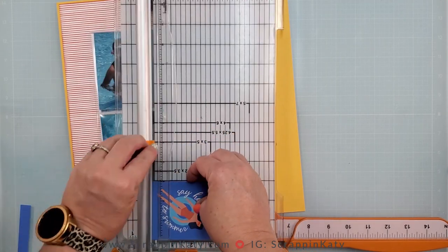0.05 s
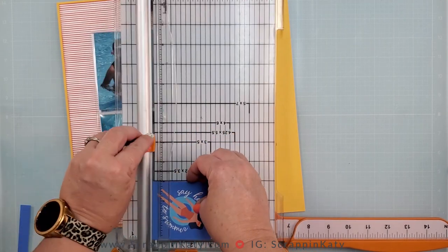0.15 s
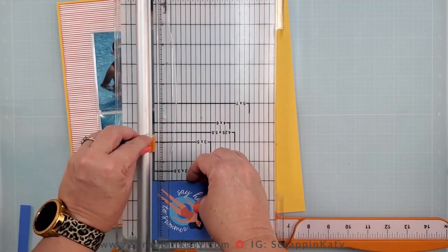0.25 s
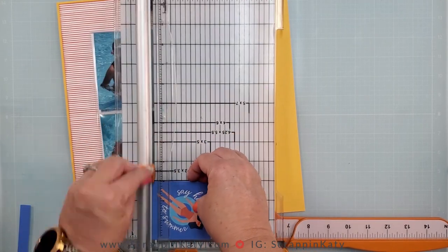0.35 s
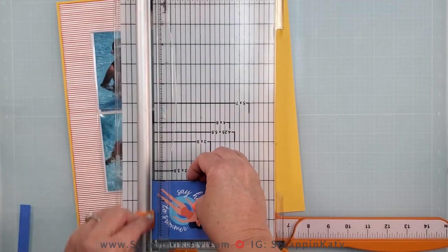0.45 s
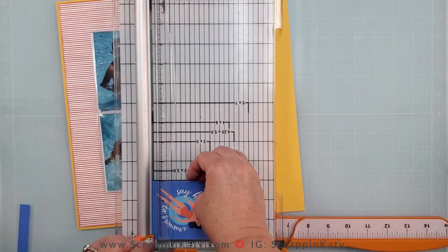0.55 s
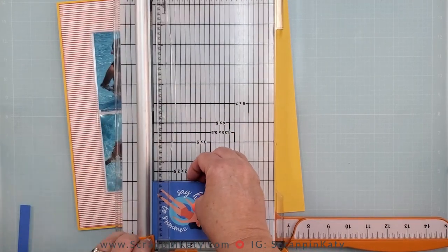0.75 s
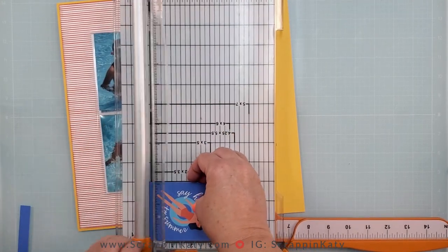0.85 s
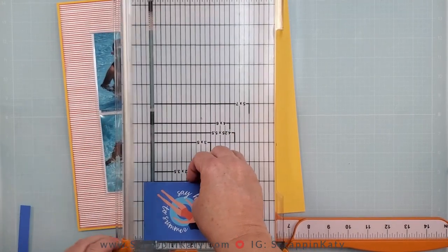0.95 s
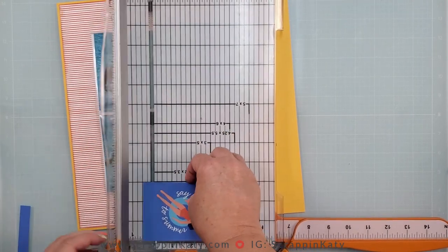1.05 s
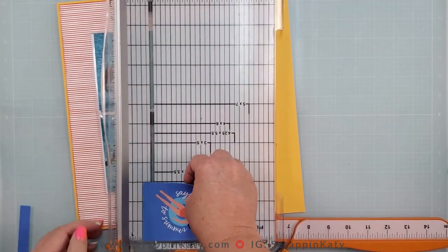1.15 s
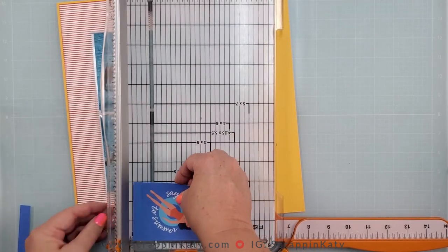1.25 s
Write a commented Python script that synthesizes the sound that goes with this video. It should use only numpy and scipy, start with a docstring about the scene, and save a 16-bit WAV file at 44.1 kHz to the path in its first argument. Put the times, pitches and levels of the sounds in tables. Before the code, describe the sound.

A sliding paper trimmer gives a sharp hollow plastic clack, a pause, a short gritty cut through cardstock ending in a knock, then faint rubbing and a soft rail rattle; close stereo microphone, small quiet room.

```python
"""A sliding paper trimmer is the main source: its blade carriage slides, clicks down, cuts through cardstock
and hits its end stop; then the guide rail is lifted. Contacts ring decaying modes of the hollow plastic base,
with short booms and noise cracks. Rubbing, cutting and lifting are gritty noise through resonances and hiss;
high carriage squeaks and lower rail tones in the cut are short tones. The table thumps, and a small room
answers over room air and a faint hum."""
import sys
import numpy as np
from scipy import signal
from scipy.fft import rfft, irfft, next_fast_len
from scipy.io import wavfile
from scipy.ndimage import uniform_filter1d, map_coordinates

SR = 44100
rng = np.random.default_rng(int(sys.argv[2]) if len(sys.argv) > 2 else 0)


def wrap_up_sound(samples):
    """Save the sound to the file named by the first command line argument, as 16-bit audio."""
    columns = np.atleast_2d(samples).T
    # keep every value between -1 and 1, then stretch to whole-number steps
    tamed = np.clip(columns, -1, 1)
    steps = np.round(tamed * 32767).astype(np.int16)
    wavfile.write(sys.argv[1], SR, steps)


N = 57330

# Levels below are source levels, ahead of the base's bass loss. Resonance and colour levels are relative.
# trimmer contacts: start_s, knock_db, ring_db, dull_crack_db, bright_crack_db, pitch_hz, rise_s, crack_t60_s
CONTACTS = [(.101, -54, -34.5, -52, -72, 540, 0.0041, 0.075),
            (0.1782, -48.5, -29, -38, -26, 500, 0.00042, 0.045),
            (.187, -37, -24, -48, -39.5, 416, 0.00035, 0.041),
            (.2040, -10.5, -31, -16, -39.5, 599, 0.00039, 0.024),
            (.2074, -7.5, -8.5, -17, -18, 539.7, 0.00051, 0.041),
            (0.464, -60, -41, -78, -78, 438, 0.00361, .02),
            (.606, -37.5, -35.5, -43, -39, 491.5, 0.00031, 0.03),
            (0.7499, -62, -16, -18.5, -21.5, 786, 0.00032, 0.033),
            (.7530, -19, -23.5, -43, -46.5, 616, 0.0025, 0.01),
            (.7585, -45, -16, -33, -66, 465, 0.0017, 0.02),
            (.878, -77.5, -67, -53, -60.5, 544, 0.0041, 0.059),
            (0.9, -51.5, -41.5, -59, -68, 540, 0.0013, 0.033),
            (0.963, -57, -31.5, -47, -63, 790, 0.00024, 0.055),
            (1.09, -48.5, -39.5, -62.5, -90.5, 432, 0.0026, .02),
            (1.257, -36.5, -28.5, -34, -42, 573, 0.0027, 0.027),
            (1.265, -34, -31, -39, -44, 550, 0.0016, 0.1), (1.28, -33, -40, -37, -33.5, 560, 0.0039, 0.045)]
# modes of the hollow plastic base: pitch_hz, level_db, t60_s
BASE_MODES = [(275, -11, 0.2), (339, -16, 0.25), (427.2, -4, 0.072), (532.2, -4, 0.11), (610, -2, 0.018),
              (743, -3, 0.039), (977, -12.5, 0.026), (1180, -14.5, 0.04), (1520, -19, 0.04),
              (1890, -18.5, 0.035), (3300, -19, 0.025)]
# noise colours of the two cracks: pitch_hz, level_db
DULL_COLOUR = [(200, -57), (500, -25.5), (900, -5.5), (1500, -6.5), (2300, -7), (3400, -7), (4300, -10.5),
               (6000, -34), (9000, -66.5)]
BRIGHT_COLOUR = [(2500, -42), (4000, -9), (5600, 5), (7300, 0.5), (9000, -7), (10200, -10), (12000, -5),
                 (16000, -9)]
# blade judders in the card that knock the base: start_s, level_db, pitch_hz
JUDDERS = [(.637, -36, 504), (.648, -35.5, 494), (.662, -41, 425), (.673, -36, 540), (.692, -36.5, 372)]
# blade in the card: time_s, base_buzz_db, low_rail_db, high_rail_db, fibre_hiss_db
CUT = [(0.609, -37.5, -37.5, -50, -41), (0.621, -51, -53, -54.5, -42), (0.671, -41, -44, -46.5, -39.5),
       (0.697, -53, -51, -52.5, -42), (0.719, -48.5, -46.5, -41.5, -42.5), (0.733, -45, -44, -57, -46.5),
       (0.749, -40, -47, -61, -44.5)]
# base buzz resonances: pitch_hz, half_width_hz, level_db
BUZZ = [(440, 30, -3), (515, 40, 0), (600, 40, -9)]
# low and high rail resonances while cutting: pitch_hz, half_width_hz, level_db
CUT_LOW = [(1045, 25, 0), (1420, 70, -8)]
CUT_HIGH = [(3240, 150, 0)]
# colour of the parting fibres: pitch_hz, level_db
CUT_HISS = [(940, -16.5), (1600, -9), (1710, -26), (1880, -13.5), (2740, -17), (3230, -3.5), (4190, -21),
            (6720, -11.5), (16000, -19.5)]
# passages of carriage and rail rubbing: time_s, base_buzz_db, low_rail_db, high_rail_db, hiss_db
RUB = [
    [(0.0, -65, -101, -49, -62), (0.016, -79.5, -65.5, -53, -59.5), (0.086, -73, -97, -59, -60),
     (0.114, -60, -104, -66, -57.5), (0.172, -84, -66, -69, -66)],
    [(0.33, -61.5, -69.5, -82, -84.5), (0.376, -75.5, -96, -99, -92), (0.446, -80, -102, -100.5, -81),
     (0.536, -82.5, -69, -82, -62), (0.58, -78.5, -85.5, -69, -61), (0.602, -72.5, -63, -55, -53)],
    [(0.82, -58, -93, -69, -66), (0.858, -62, -70, -82, -72.5), (0.878, -60, -81, -57, -74),
     (0.9, -53.5, -61, -74, -69), (0.95, -77.5, -93, -88.5, -95.5)],
    [(0.99, -49.5, -74, -63, -72), (1.014, -61.5, -73, -87, -76), (1.096, -81.5, -74, -76, -77),
     (1.208, -67, -68, -67, -64), (1.238, -50, -66.5, -61.5, -55), (1.255, -41, -65, -57, -53.5)],
]
# low and high rail resonances while rubbing: pitch_hz, half_width_hz, level_db
RAIL_LOW = [(1050, 40, -7), (1390, 40, 0)]
RAIL_HIGH = [(2220, 80, -10), (3100, 150, -5), (3480, 50, 0)]
# colour of the rubbing hiss: pitch_hz, level_db
RUB_HISS = [(2060, -21.5), (3500, -26.5), (4240, -16), (5600, -12.5), (7560, -17), (9930, -31.5),
            (11600, -21), (16000, -24.5)]
# short tones, high carriage squeaks and lower rail tones during the cut;
# their levels waver around level_db: start_s, length_s, pitch_hz, level_db
SHORT_TONES = [(0.07, 0.02, 4310, -59.5), (.113, .016, 5650, -60.5), (0.673, 0.014, 1063, -50),
               (.697, 0.038, 1088, -45)]
# jolts of the lifting rail: start_s, level_db
LIFT = [(1.186, -59), (1.241, -49.5), (1.263, -35.5), (1.272, -39.5), (1.278, -38)]
# resonances of the lifted rail: pitch_hz, half_width_hz, level_db
LIFT_RING = [(1150, 50, -5), (3470, 100, 0), (11800, 250, -14)]
# table thumps: start_s, peak_db, pitch_hz
THUMPS = [(.203, -54, 61.9), (0.23, -47.5, 97.8), (0.612, -48.5, 66.7), (0.758, -34, 63.6),
          (1.006, -54, 70), (1.275, -42.5, 87)]
# room decay: pitch_hz, t60_s
ROOM = [(100, 0.3), (500, 0.16), (2000, 0.16), (6000, 0.13), (15000, 0.12)]
# colour of the room air: pitch_hz, level_db
AIR = [(15, -52.5), (25, -18.5), (76, 1.5), (123, -10.5), (217, -5.5), (293, -8.5), (775, -19.5),
       (1130, -23), (4490, -30), (7310, -36), (16000, -50.5)]
# hum tones, whose levels waver around: pitch_hz, peak_db
HUM = [(181, -71.5), (241, -68.5), (299, -71)]

FAVOUR_DB, FAVOUR_OCT = 12, .2  # contrast of modes near the contact's pitch, and how near
SOFT_LOSS = .25  # how fast a soft contact loses the upper modes
KNOCK_CYCLES = 2.4  # the hollow base booms this long before the contact damps it
CUT_RISE, BUZZ_SINK = 1.08, .92  # pitch ratios late in the cut: rail ring and base buzz
CUT_RISE_S = .685, .715  # start and end of that pitch change
LIFT_RISE_S, LIFT_T60_S = 0.00056, 0.056
TABLE_S = 0.017  # time to the top of a thump
RADIATES_HZ = 100  # the small base gives off little bass below
PORT_HZ, PORT_RAD = 1020, 1.78  # ports differ in phase above this pitch, by up to this angle
PORT_STEP_HZ = 130  # how quickly the lead wanders with pitch
ROOM_DB, ROOM_DELAY_S = -15.5, .011
ROOM_WIDE_HZ = 486.7  # the room is near mono below
AIR_LAYER_DB = -68.5 + 20 * np.log10(1.2)  # rms of each of the two air layers
TOP_HZ = 15750  # band limit


def amp(db):
    """Turn dB into gain."""
    return 10 ** (np.asarray(db) / 20)


def unit(x):
    """Bring a sound to rms 1."""
    return x / np.sqrt(np.mean(x ** 2) + 1e-20)


def along(points, hz):
    """Read a curve of (pitch_hz, value) points on a log pitch axis."""
    point_hz, values = np.transpose(points)
    return np.interp(np.log(hz + 1), np.log(point_hz + 1), values)


def gains(rows):
    """Draw one gain curve for each dB column, at -150 dB outside the rows."""
    times, *columns = np.transpose(rows)
    now = np.arange(N) / SR
    return [amp(np.interp(now, times, levels_db, -150, -150)) for levels_db in columns]


def since(start):
    """Seconds since an event, held at zero before it."""
    return np.clip(np.arange(N) / SR - start, 0, None)


def wobble(rate):
    """Draw a smooth random curve with this many knots a second."""
    knots = rng.standard_normal(int(N * rate / SR) + 4)
    return map_coordinates(knots, [np.arange(N) * rate / SR])


def filtered(x, response):
    """Shape a sound by a complex response of frequency."""
    size = next_fast_len(N + SR // 2)
    spectrum = rfft(x, size) * response(np.fft.rfftfreq(size, 1 / SR))
    return irfft(spectrum, size)[..., :N]


def resonant(peaks, grit_db):
    """Gritty noise through steep two-stage resonances, 6 dB down at the half width; rms 1."""
    grit = rng.standard_normal(N) * amp(grit_db * wobble(300))

    def shape(f):
        total = 0
        for centre, width, db in peaks:
            stage = 2j * f * width / (centre * centre - f * f + 2j * f * width)
            total = total + amp(db) * stage ** 2
        return total

    return unit(filtered(grit, shape))


def hiss(spectrum, grit_db, channels=()):
    """Coloured noise, its level grainy where grit is given; rms 1."""
    noise = rng.standard_normal(channels + (N,)) * amp(grit_db * wobble(200))
    return unit(filtered(noise, lambda f: amp(along(spectrum, f))))


def burst(start, length, hz):
    """A tone that swells and fades within its length."""
    u = np.clip(since(start), 0, length)
    return np.sin(np.pi * u / length) * np.sin(2 * np.pi * hz * u)


def contacts():
    """Each contact rings the base and cracks briefly; softer ones rise slower and ring duller."""
    ring, dull, bright = np.zeros((3, N + SR))
    t = np.arange(SR // 3) / SR
    for start, _, ring_db, dull_db, bright_db, hz, soft, t60 in CONTACTS:
        at = slice(round(start * SR), round(start * SR) + len(t))
        rise = 1 - np.exp(-t / soft)
        modes = np.zeros(len(t))
        for mode_hz, mode_db, mode_t60 in BASE_MODES:
            nearness = np.exp(-(np.log2(mode_hz / hz) / FAVOUR_OCT) ** 2)
            softening = (1 + (hz * soft * SOFT_LOSS) ** 2) / (1 + (mode_hz * soft * SOFT_LOSS) ** 2)
            strength = amp(FAVOUR_DB * (nearness - 1.5)) * softening
            jitter_db = rng.normal(0, 1.5)  # no two contacts excite a mode equally
            decay = amp(mode_db + jitter_db - 60 * t / mode_t60)
            modes += strength * decay * np.sin(2 * np.pi * mode_hz * t)
        ring[at] += amp(ring_db) * modes * rise
        dull[at] += amp(dull_db - 60 * t / t60) * rise
        bright[at] += amp(bright_db - 60 * t / t60) * rise
    return ring[:N] + dull[:N] * hiss(DULL_COLOUR, 2) + bright[:N] * hiss(BRIGHT_COLOUR, 2)


def knocks():
    """The hollow base booms for a few cycles at every contact and judder."""
    rows = [(start, db, hz) for start, db, _, _, _, hz, _, _ in CONTACTS] + JUDDERS
    return sum(amp(db) * burst(start, KNOCK_CYCLES / hz, hz) for start, db, hz in rows)


def gliding(peaks, ratio):
    """Crossfade a resonant noise into one at shifted pitch as the carriage nears the end."""
    late = np.interp(np.arange(N) / SR, CUT_RISE_S, [0, np.pi / 2])
    shifted = [(hz * ratio, width, db) for hz, width, db in peaks]
    return np.cos(late) * resonant(peaks, 2) + np.sin(late) * resonant(shifted, 2)


def cutting():
    """The blade parts the fibres and shakes base and rail; the rail ring climbs, the base buzz sinks."""
    buzz, low, high, fibres = gains(CUT)
    base = buzz * gliding(BUZZ, BUZZ_SINK)
    rail = low * gliding(CUT_LOW, CUT_RISE) + high * gliding(CUT_HIGH, CUT_RISE)
    return base + rail + fibres * hiss(CUT_HISS, 1.4)


def rubbing():
    """Carriage and rail rub: base and rail ring faintly under a thin hiss."""
    levels = np.sum([gains(part) for part in RUB], axis=0)
    buzz, low, high, thin = uniform_filter1d(levels, size=441)  # eased over 10 ms
    rail = low * resonant(RAIL_LOW, 2) + high * resonant(RAIL_HIGH, 2)
    return buzz * resonant(BUZZ, 2) + rail + thin * hiss(RUB_HISS, 1.5)


def short_tones():
    """Short tones of unsteady level: high carriage squeaks, and lower rail tones during the cut."""
    return sum(amp(db + 3 * wobble(250)) * burst(start, length, hz) for start, length, hz, db in SHORT_TONES)


def lifting():
    """The rail jolts in its hinges and rings roughly, each jolt rising fast and dying away."""
    jolts = np.zeros(N)
    for start, db in LIFT:
        u = since(start)
        jolts += amp(db - 60 * u / LIFT_T60_S) * (1 - np.exp(-u / LIFT_RISE_S))
    return jolts * resonant(LIFT_RING, 3.1)


def table():
    """The table top swells and dies in a few low cycles."""
    thumps = np.zeros(N)
    for start, db, hz in THUMPS:
        u = since(start)
        swell = (u / TABLE_S) ** 2 * np.exp(2 - 2 * u / TABLE_S)
        thumps += amp(db) * swell * np.sin(2 * np.pi * hz * u)
    return thumps


def ports(x):
    """Bass meets both ports in phase; treble gets a phase lead that wanders with pitch."""
    knots = rng.standard_normal(size=200)

    def response(f):
        wander = np.tanh(2 * map_coordinates(knots, [f / PORT_STEP_HZ]))
        lead = PORT_RAD * wander * f ** 4 / (f ** 4 + PORT_HZ ** 4)
        return amp([[.4], [-.4]]) * np.exp([[.5j], [-.5j]] * lead)

    return filtered(x, response)


def room(x):
    """The small room answers with a noise tail; each frequency dies at its own speed."""
    hz, t, z = signal.stft(rng.standard_normal((2, SR // 3)), SR, nperseg=128)
    z[1] *= (hz / (hz + ROOM_WIDE_HZ))[:, None]  # less side signal in the bass
    decay = amp(-60 * t / along(ROOM, hz)[:, None])
    tail = signal.istft(z * decay, SR, nperseg=128)[1]
    tail /= np.linalg.norm(tail[0])
    delayed = np.pad(x, (round(ROOM_DELAY_S * SR), 0))
    mid, side = signal.fftconvolve(delayed[None], tail, axes=1)[:, :N]
    return np.array([mid + side, mid - side])


def background():
    """Room air, partly shared by both channels, and faint hum tones of wavering level."""
    t = np.arange(N) / SR
    hum = np.zeros(N)
    for hz, db in HUM:
        hum += amp(db + 1.4 * wobble(23.0)) * np.sin(2 * np.pi * (hz * t + rng.random()))
    common, own = hiss(AIR, 0), hiss(AIR, 0, channels=(2,))
    return amp(AIR_LAYER_DB) * (common + own) + hum


def scene():
    """Trimmer and table at the ports, the trimmer's room answer, and the background."""
    parts = contacts() + knocks() + cutting() + rubbing() + short_tones() + lifting()
    trimmer = filtered(parts, lambda hz: (1j * hz / (RADIATES_HZ + 1j * hz)) ** 2)
    return ports(trimmer + table()) + amp(ROOM_DB) * room(trimmer) + background()


def record(dry):
    """Keep nothing at or above the band limit."""
    return filtered(dry, lambda hz: hz < TOP_HZ)


dry = scene()
out = record(dry)
wrap_up_sound(out)
```